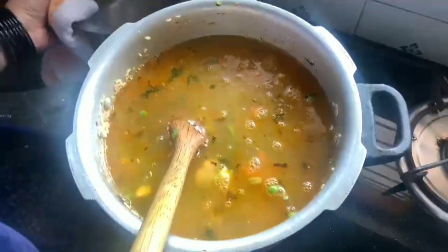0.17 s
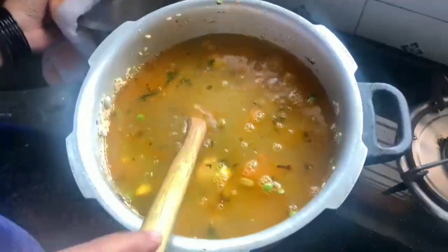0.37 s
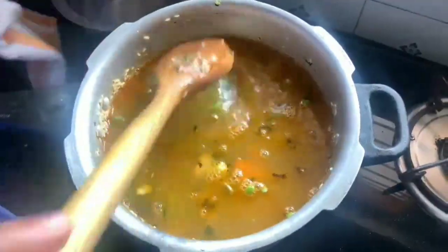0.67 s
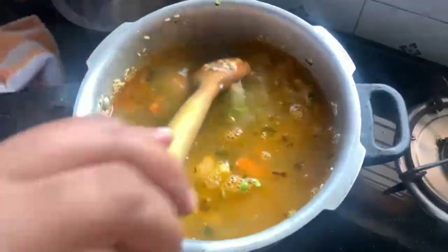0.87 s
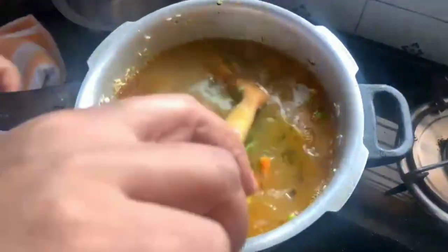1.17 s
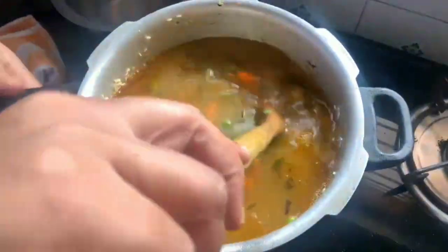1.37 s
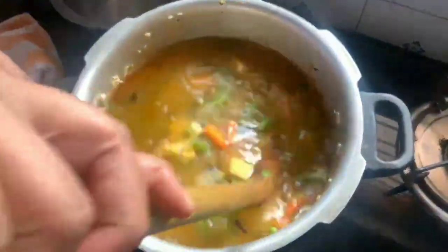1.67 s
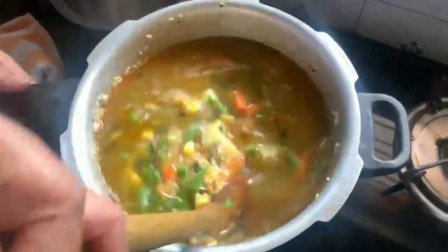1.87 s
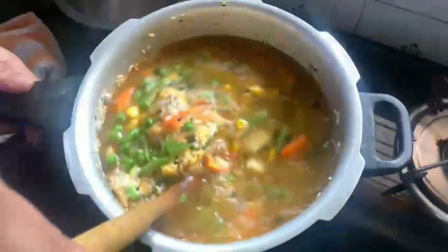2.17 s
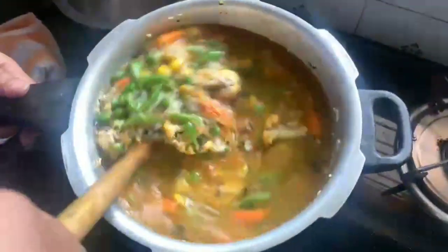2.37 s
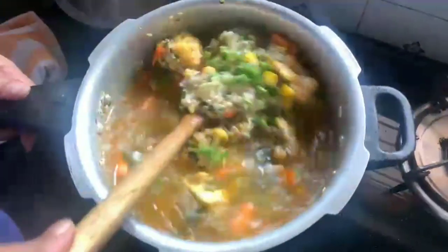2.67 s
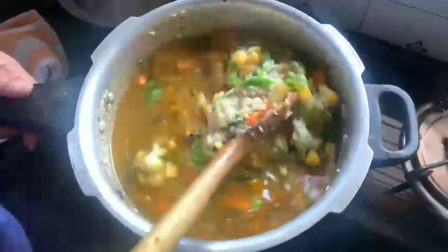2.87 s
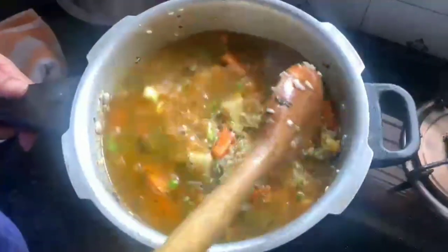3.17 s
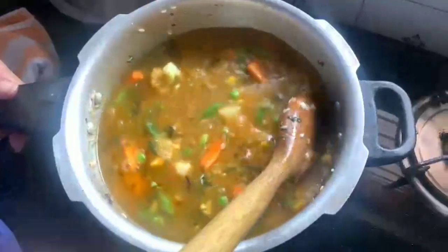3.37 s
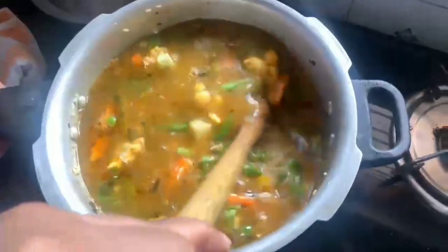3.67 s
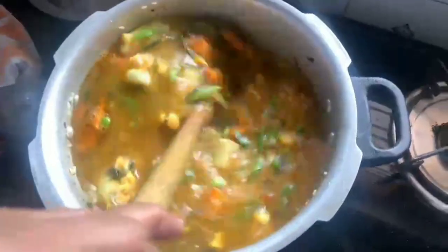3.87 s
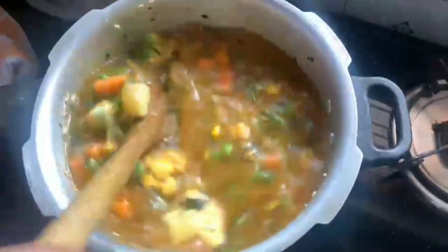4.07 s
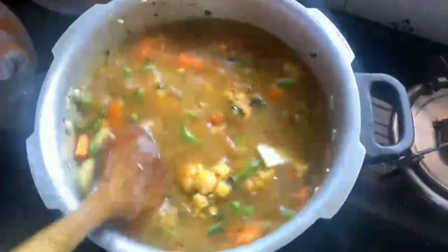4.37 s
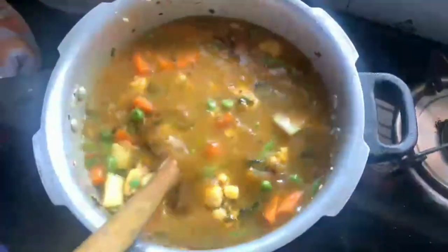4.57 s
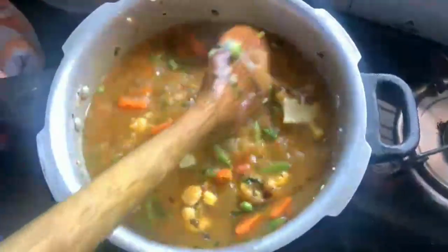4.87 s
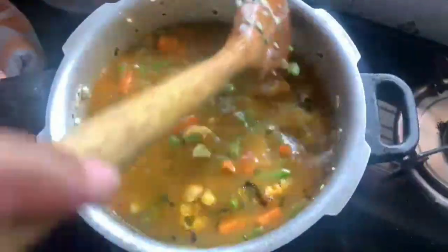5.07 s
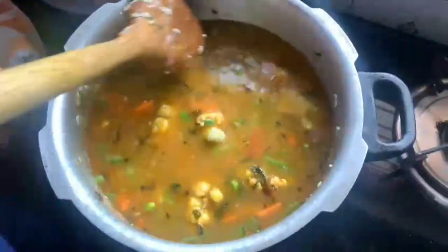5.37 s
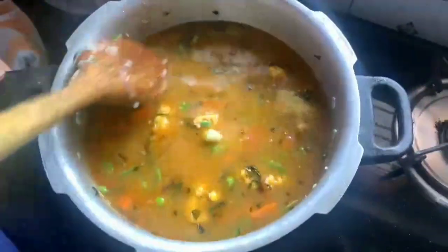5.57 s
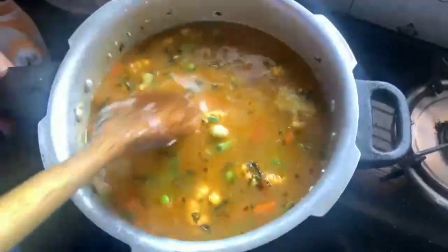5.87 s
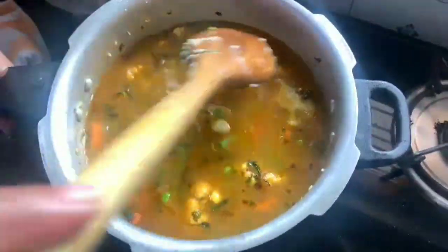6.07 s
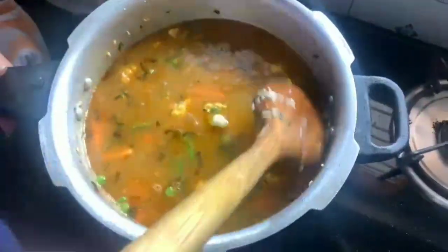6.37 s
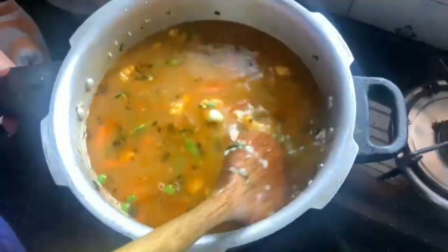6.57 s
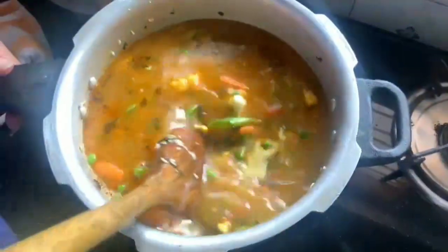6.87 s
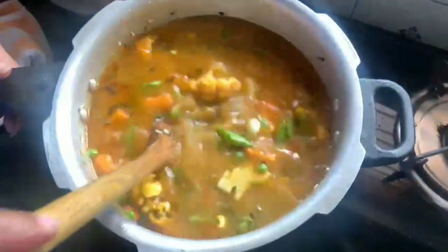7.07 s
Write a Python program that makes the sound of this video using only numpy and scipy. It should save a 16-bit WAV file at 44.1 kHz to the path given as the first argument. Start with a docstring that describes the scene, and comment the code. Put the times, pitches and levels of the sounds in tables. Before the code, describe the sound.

A metal vessel clangs down, then a wooden spoon stirs thick, wet rice and vegetable broth with squelches, plops and a few knocks against the pot.

```python
"""A wooden spoon stirs rice, vegetables and hot water in a pressure cooker, close to the microphone.
Swarms of tiny fading tones and coloured noise make the broth slosh, squelch and fizz; noise puffs and
rising tones make splashes and plops. The spoon knocks, drags, thuds and rubs. At the start a metal vessel
clangs: noise blows and fluttering modes. Two wavering hums, rumble and air noise fill the tiled kitchen."""
import sys
import numpy as np
from scipy import signal
from scipy.fft import rfft, irfft, next_fast_len
from scipy.io import wavfile
from scipy.ndimage import map_coordinates

SR = 44100
rng = np.random.default_rng(int(sys.argv[2]) if len(sys.argv) > 2 else 0)


def dump(signal):
    """Clip the signal to [-1, 1] and save it as 16-bit WAV at the path in sys.argv[1]."""
    limited = np.clip(np.atleast_2d(signal).T, -1, 1)
    pcm = np.round(limited * 32767).astype(np.int16)
    wavfile.write(sys.argv[1], SR, pcm)


N = 318798  # length in samples
TOP_HZ = 12900  # nothing is heard above this

# how alike left and right are: pitch_hz, likeness (0 to 1)
ALIKE = [(60, 1), (130, 0.85), (280, 0.95), (590, 0.18), (1260, 0.15), (2700, 0.047), (5500, 0.028),
         (8000, 0.99), (11000, 0.87), (12500, 0.99)]
# colour of the finest bursting bubbles: pitch_hz, level_db
FIZZ = [(2500, -45), (5000, -15), (7000, 6), (8800, 10.5), (10500, 10), (12500, 16)]
# colour of the pot when the spoon strikes or drags on it: pitch_hz, level_db
KNOCK_BODY = [(120, -8), (260, -5), (340, 6.5), (470, -5), (600, 2), (830, 6.5), (1100, 0), (1400, -1),
              (1900, 1), (2800, -1), (3600, -9.5), (4300, -14), (6500, -11.5), (9000, -19), (12000, -13)]


def amp(db):
    """Decibels to gain."""
    return 10 ** (np.asarray(db) / 20)


def unit(x):
    """Scale to rms 1."""
    return x / np.sqrt(np.mean(x ** 2) + 1e-20)


def along(points, hz):
    """Read (Hz, value) points on a log axis."""
    point_hz, value = np.transpose(points)
    return np.interp(np.log(hz + 1), np.log(point_hz + 1), value)


def curves(rows):
    """One value per sample for each column after the time."""
    s, *columns = np.transpose(rows)
    return [np.interp(np.arange(N) / SR, s, column) for column in columns]


def wobble(rate):
    """A smooth random curve, rate knots a second."""
    knots = rng.standard_normal(int(N * rate / SR) + 4)
    return map_coordinates(knots, [np.arange(N) * rate / SR])


def fading(db, t60):
    """Half a second of a level dying away by 60 dB in t60 seconds."""
    return amp(db - 60 * np.arange(SR // 2) / SR / t60)


def filtered(x, response):
    """Multiply the spectrum of x by a response to frequency."""
    n = x.shape[-1]
    m = next_fast_len(n + SR // 2)
    return irfft(rfft(x, m) * response(np.fft.rfftfreq(m, 1 / SR)), m)[..., :n]


def shaped(x, spectrum):
    """Colour a sound by (Hz, dB) points, rms 1."""
    return unit(filtered(x, lambda hz: amp(along(spectrum, hz))))


def add(track, s, sound):
    """Mix a sound into a track at a time in seconds."""
    part = track[..., max(0, round(s * SR)):][..., :sound.shape[-1]]
    part += sound[..., :part.shape[-1]]


def add_grains(when, grains, span):
    """Add up many short sounds, one a row, each starting at its share (0 to 1) of a span of samples."""
    places = (when * span).astype(int) + np.arange(grains.shape[1])
    return np.bincount(places.ravel(), grains.ravel(), span)


def diffuse(response, size=N):
    """Coloured stereo noise whose middle and side parts are balanced to the likeness of the two ports."""
    def mid_and_side(hz):
        turn = np.arccos(np.clip(along(ALIKE, hz), -1, 1)) / 2
        return response(hz) * np.array([np.cos(turn), np.sin(turn)])

    mid, side = filtered(rng.standard_normal((2, size)), mid_and_side)
    return np.array([mid + side, mid - side]) / np.std(mid)


def burst(response, t60, size=4096):
    """A stereo puff of coloured noise that dies away, peak 1."""
    hz = np.fft.rfftfreq(size, 1 / SR)
    phase, spread = rng.uniform(-np.pi, np.pi, (2, len(hz)))
    spread = spread * np.sqrt(np.clip(1 - along(ALIKE, hz), 0, 1)) / 2
    noise = irfft(np.exp(1j * (phase + np.array([spread, -spread]))))
    noise = noise * amp(-60 * np.arange(size) / SR / t60)
    # minimum phase: the colour rings after the blow, never before it
    log_gain = np.log(response(np.abs(np.fft.fftfreq(size, 1 / SR))) + 1e-5)
    colour = np.exp(np.conj(signal.hilbert(log_gain)))
    puff = irfft(rfft(noise) * colour[:len(hz)])
    return puff / np.abs(puff).max()


def room(x):
    """The kitchen's reverberation: a tail of fading noise, different at each port."""
    # how long the echo lasts: pitch_hz, t60_s (time to fall 60 dB)
    echo_times = [(200, 0.63), (1000, 0.35), (4000, 0.34), (11000, 0.084)]
    hz, t, noise = signal.stft(rng.standard_normal((2, SR // 2)), SR, nperseg=256)
    fade = amp(-60 * t / along(echo_times, hz)[:, None])
    balance = np.sqrt(np.clip(1 + np.outer([1, -1], along(ALIKE, hz)), 0, 2))[..., None]
    mid, side = signal.istft(noise * fade * balance, SR, nperseg=256)[1]
    tail = np.pad([mid + side, mid - side], ((0, 0), (SR // 250, 0)))  # starts 4 ms late
    return signal.fftconvolve(np.atleast_2d(x), tail / np.linalg.norm(tail[0]), axes=1)[:, :N]


def from_pot(x, wall_db, wall_t60, room_db):
    """Direct sound from the broth, quick echoes off the pot's wall, then the room."""
    t = np.arange(SR // 16) / SR
    walls = diffuse(np.ones_like, size=len(t)) * amp(-60 * t / wall_t60) * (t > 1 / 1500)
    echoes = signal.fftconvolve(x[None], walls / np.linalg.norm(walls[0]), axes=1)[:, :N]
    return x + amp(wall_db) * echoes + amp(room_db) * room(x)


def bubbles(rate, low_hz, high_hz, cycles, spread_db, size):
    """A steady swarm of tiny damped tones, rising in pitch, a few of them loud; rms 1."""
    when, pitch, strength = rng.random((int(rate * N / SR), 3)).T[..., None]
    turns = low_hz * (high_hz / low_hz) ** pitch * np.arange(size) / SR
    age = np.minimum(turns / cycles, 2)
    level = amp(-spread_db * np.log(strength + 0.0035) - 30 * turns / cycles)
    tones = level * np.sin(2 * np.pi * turns * (1 + 0.092 * age))
    return unit(add_grains(when, tones, N)[:N])


def uneven(x):
    """Raise and lower patches of a sound at random, smoothly over pitch and time."""
    depth_db, width_hz, hold_s = 5, 520, .065
    hz, t, spectrum = signal.stft(x, SR, nperseg=512)
    where = np.meshgrid(hz / width_hz, t / hold_s, indexing="ij")
    knots = rng.standard_normal([int(axis.max()) + 2 for axis in where])
    gain = amp(depth_db * np.clip(map_coordinates(knots, where), -2, 2))
    return signal.istft(spectrum * gain, SR, nperseg=512)[1][:N]


def ring(hz, envelope, flutter_db):
    """Ringing metal: each mode follows its envelope and flutters in level and phase."""
    t = np.arange(SR // 2) / SR
    knots = np.linspace(0, t[-1], 36)
    flutter = lambda: np.interp(t, knots, rng.standard_normal(len(knots)))
    swell, slip = np.array([[flutter() for _ in hz] for _ in range(2)])
    phase, offset = rng.uniform(-np.pi, np.pi, (len(hz), 2)).T[..., None]
    offset = offset * np.sqrt(np.clip(1 - along(ALIKE, hz), 0, 1)) / (2 * np.pi)
    angle = 2 * np.pi * hz * t + phase + slip / 2 + np.array([offset, -offset])
    modes = envelope * amp(flutter_db * swell) * np.sin(angle)
    return modes.sum(1) * (1 - np.exp(-t / 0.00043))  # soft onset


def stirring():
    """The spoon pushes broth about, wet rice squelches apart and tiny bubbles burst."""
    # how hard the spoon pushes the broth, before trims: start_s, level_db
    push_curve = [(.8, -85), (1.1, -60), (1.42, -57.5), (1.545, -53.5), (1.72, -60.5), (2.07, -71),
                  (2.22, -55.5), (2.45, -56), (2.52, -56.5), (2.56, -56.5), (2.66, -52.5), (2.88, -64.5),
                  (3.4, -65.5), (4.1, -70), (4.6, -58), (4.9, -96), (5.2, -57)]
    # how much wet rice turns over at the surface, before trims: start_s, level_db
    churn_curve = [(.55, -76), (.75, -77), (.97, -69), (1.31, -81.5), (1.6, -71), (1.95, -64.5),
                   (2.12, -69), (2.4, -55), (2.6, -64), (2.83, -59.5), (3.0, -57.5), (3.4, -60),
                   (3.68, -65), (3.85, -57), (4.08, -52), (4.2, -58), (4.7, -66.5), (5.2, -78)]
    # colours of the moving broth and of the parting rice: pitch_hz, level_db
    slosh_colour = [(150, -12.5), (300, 8.5), (600, 1), (900, 3), (1400, 4.5), (2200, -39), (4000, -31),
                    (9000, -61)]
    squelch_colour = [(600, -27), (1200, 1), (2000, -10), (3400, -7.5), (5000, -4.5), (7500, -14.5),
                      (12000, -32)]
    slosh_db, squelch_db, fizz_db = -1.5, -4.5, 0.5  # slosh against the push, the others against the churn

    (push_db,), (churn_db,) = curves(push_curve), curves(churn_curve)
    churn = amp(churn_db + 2.5 * wobble(8.7))  # the rice gives way unevenly
    in_broth = np.interp(np.arange(N) / SR, [.3, .45, 5.12, 5.25], [0, 1, 1, 0])
    # between the bubbles, rice slides over the wood in quick uneven surges
    swish = lambda: unit(amp(3 * wobble(45)) * rng.standard_normal(N))
    clumps = unit(amp(3 * wobble(26)))  # the grains come in clumps
    gurgle = bubbles(rate=900, low_hz=200, high_hz=1800, cycles=4, spread_db=1.3, size=700)
    grains = bubbles(rate=700, low_hz=1500, high_hz=8000, cycles=10, spread_db=3, size=250)
    pops = bubbles(rate=450, low_hz=5200, high_hz=12500, cycles=8, spread_db=4.3, size=100)
    slosh = shaped(gurgle + swish() / 2, slosh_colour) * amp(push_db + slosh_db + 1.5 * wobble(18))
    squelch = shaped(uneven(grains + swish() / 3), squelch_colour) * amp(squelch_db)
    fizz = shaped(uneven(pops + swish() / 3), FIZZ) * amp(fizz_db)
    broth = slosh + churn * clumps * (squelch + fizz) + crackle()
    return from_pot(in_broth * broth, wall_db=-7, wall_t60=.03, room_db=-13)


def crackle(count=90, size=400):
    """As a lump parts, wet films between the grains burst in a shower of tiny pitched ticks, with fizz."""
    # lumps that pull apart or slide off the spoon: middle_s, level_db (before trims), pitch_hz, length_s
    lumps = [(0.495, -60.5, 4470, 0.091), (1.042, -64, 4300, 0.15), (1.216, -69, 1400, 0.095),
             (1.999, -73, 5000, 0.064), (2.485, -52, 4370, 0.082), (2.62, -59.5, 1830, 0.057),
             (2.677, -52, 6100, 0.11), (2.736, -55.5, 4080, 0.056), (2.784, -48.5, 6430, 0.061),
             (2.827, -49, 5960, 0.081), (2.862, -63, 6040, 0.068), (2.917, -56.5, 5500, 0.082),
             (3.006, -70, 4200, 0.058), (3.156, -55.5, 6560, .14), (3.154, -62, 2140, .12),
             (3.22, -59, 4500, 0.047), (3.295, -59, 5450, 0.055), (3.349, -62, 6100, 0.036),
             (3.396, -72, 5500, 0.063), (3.493, -58.5, 3670, .11), (3.826, -49.5, 3800, 0.064),
             (3.943, -47, 3000, 0.061), (4.011, -47, 1810, 0.11), (4.06, -48, 7000, 0.052),
             (4.082, -58, 2400, 0.051), (4.108, -54, 2060, 0.045), (4.11, -50.5, 7000, 0.079),
             (4.149, -55, 1840, 0.048), (4.15, -76, 6000, 0.072), (4.218, -56, 5940, 0.038),
             (4.22, -53, 1800, 0.076), (4.253, -59, 7000, 0.075), (4.298, -64, 3580, 0.045),
             (4.476, -57, 7500, 0.042), (4.55, -64, 6000, 0.053), (4.593, -61, 4440, 0.031),
             (4.899, -60, 2600, 0.11), (4.948, -60, 3600, 0.029)]
    tick_db, fizz_db = -0.5, -2  # trims on each lump's level
    scatter_octaves, life_cycles = 0.46, 13.3  # a tick falls 40 dB in its life
    showers, swell = np.zeros(N), np.zeros(N)
    for s, db, pitch_hz, length_s in lumps:
        span = int(length_s * SR)
        when = rng.beta(2.5, 2.5, (count, 1))  # thickest in the middle
        pitch, strength = np.clip(rng.standard_normal((2, count, 1)), -2, 2)
        tick_hz = np.minimum(pitch_hz * 2 ** (scatter_octaves * pitch), TOP_HZ)
        turns = tick_hz * np.arange(size) / SR
        ticks = amp(4 * strength - 40 * turns / life_cycles) * np.sin(2 * np.pi * turns)
        shower = add_grains(when, ticks, span)
        add(showers, s - length_s / 2, amp(db + tick_db) * unit(shower) / 2)
        add(swell, s - length_s / 2, amp(db + fizz_db) * np.hanning(span))
    pops = bubbles(rate=1500, low_hz=5200, high_hz=12500, cycles=8, spread_db=3, size=100)
    return showers + swell * shaped(pops, FIZZ)


def splashes():
    """Drops smack the surface amid faint clicks; trapped air rings with a slightly rising pitch."""
    # drops and wet smacks: start_s, level_db, brightest_hz
    drops = [(0.473, -34, 6300), (0.7171, -33.5, 2300), (0.83, -21, 4300), (1.015, -43, 6660),
             (1.082, -41, 6600), (1.187, -45.5, 7400), (1.6797, -49, 9500), (1.6997, -48, 10000),
             (1.799, -45.5, 7500), (1.899, -46, 9500), (1.981, -41, 3260), (2.2215, -43.5, 9500),
             (2.353, -45, 8700), (2.3752, -46, 10000), (2.445, -42, 7350), (2.478, -20.5, 4400),
             (2.613, -42, 9400), (2.678, -49, 7000), (2.7783, -44, 6500), (2.8133, -29, 6000),
             (2.899, -40, 10000), (2.998, -40.5, 9500), (3.1109, -33.5, 9100), (3.129, -37, 7000),
             (3.342, -37, 9200), (3.365, -29, 10700), (3.7395, -23.5, 7100), (3.742, -31, 5000),
             (3.771, -20.5, 8300), (3.8154, -28.5, 2850), (3.824, -25, 3540), (3.8874, -41, 3000),
             (3.916, -34, 7000), (3.9325, -18, 6000), (3.942, -23, 4070), (3.951, -31, 4200),
             (4.0174, -24.5, 3000), (4.0516, -28.5, 6600), (4.062, -29, 7500), (4.089, -18.5, 9200),
             (4.093, -43, 9000), (4.108, -30, 8000), (4.097, -31, 2090), (4.112, -36, 2000),
             (4.148, -45, 1800), (4.24, -36, 3500), (4.315, -42, 2520), (4.178, -33, 10400),
             (4.1982, -38, 10400), (4.2162, -23, 9300), (4.2228, -25.5, 9800), (4.3747, -38.5, 10400),
             (4.4036, -45, 5700), (4.4353, -45.5, 11000), (4.474, -37, 6500), (4.5025, -42, 10560),
             (4.8434, -42.5, 6850), (4.896, -44, 10500), (4.941, -53, 7500), (4.991, -47.5, 10400),
             (5.0624, -43.5, 11200), (5.089, -47, 11300), (5.172, -45, 11000), (6.488, -43, 11000),
             (6.6018, -46.5, 4530)]
    # air pockets closing behind the spoon: start_s, level_db (before trims), pitch_hz (at first), t60_s
    air_pockets = [(0.717, -35, 1930, 0.038), (2.957, -44.5, 1010, .015), (3.488, -41, 3120, 0.028),
                   (3.739, -25.5, 2220, 0.011), (3.7736, -27, 720, 0.011), (3.826, -26, 3570, 0.02),
                   (3.853, -36.5, 1185, 0.028), (3.9344, -26.5, 1750, 0.018), (3.987, -41, 1600, .015),
                   (4.018, -23.5, 964, 0.032), (4.044, -37, 870, 0.04), (4.084, -33.5, 2480, 0.021),
                   (4.106, -33.5, 1970, 0.022), (4.144, -40, 1460, 0.024)]
    wet = [(300, -48), (1100, -16), (2300, 6.5), (6000, 5.0), (12000, 14.0), (14000, -38.5)]  # (Hz, dB)
    # faint clicks scattered just before and after a smack: time scale, level against it
    click_s, click_db = 0.014, -20.5

    smacks, plops, t = np.zeros(N), np.zeros(N), np.arange(SR // 10) / SR
    band = lambda centre, octaves: lambda hz: 1 / (1 + (np.log2(hz / centre + 0.0007) / octaves) ** 2)
    for s, db, bright_hz in drops:
        colour = lambda hz: band(bright_hz, octaves=1.1)(hz) * amp(along(wet, hz))
        add(smacks, s, amp(db) * burst(colour, t60=.007)[0])
        for offset in rng.uniform(-.5, 1, size=4):
            click = burst(colour, t60=0.012, size=1024)[0]
            add(smacks, s + click_s * offset, amp(db + click_db - 13 * abs(offset)) * click)
    for s, db, pitch_hz, t60 in air_pockets:
        tone = np.sin(2 * np.pi * pitch_hz * t * (1 + 2 * t)) * amp(-60 * t / t60)
        add(plops, s, amp(db - 2) * tone)
        add(plops, s, amp(db - 6) * burst(band(pitch_hz, octaves=0.45), t60=0.02)[0])
    return from_pot(smacks + plops, wall_db=-2, wall_t60=0.04, room_db=-10)


def knocks():
    """The spoon cracks against the pot and rebounds; the filled pot rings briefly, duller if soft."""
    # contacts with the pot: start_s, level_db, dull_above_hz
    contacts = [(2.4634, -32, 2000), (3.107, -41, 1790), (6.3297, -19.5, 9000), (6.4343, -30.5, 2100),
                (6.4863, -34.5, 1710)]
    # the filled pot's damped ring, before trims: pitch_hz, level_db, t60_s
    pot_modes = [(344, -4.5, 0.053), (766, -7, 0.014), (860, -3.5, 0.065), (1916, -5.5, 0.043),
                 (2140, -14, 0.047), (2650, -28, 0.027), (2790, -11, 0.026), (3800, -10, .025),
                 (6340, -17, 0.033)]
    ring_db, rebound_s, rebound_db = -9.5, .0028, -7.5  # ring and second contact against the crack

    blows = np.zeros((2, N))
    hz, mode_db, t60 = np.transpose(pot_modes)[..., None]
    for s, db, dull_hz in contacts:
        soft = lambda f: 1 / np.hypot(1, (f / dull_hz) ** 2)
        colour = lambda f: amp(along(KNOCK_BODY, f)) * soft(f)
        rebound_colour = lambda f: colour(f) / np.hypot(1, f / 3500)
        add(blows, s, amp(db) * burst(colour, t60=.014))
        add(blows, s + rebound_s, amp(db + rebound_db) * burst(rebound_colour, t60=0.04))
        pot_ring = ring(hz, soft(hz) * fading(mode_db, t60), flutter_db=-5.0)
        add(blows, s, amp(db + ring_db) * pot_ring)
    return blows + amp(-11.5) * room(blows)


def drag():
    """Wood sticks and slips on the wet metal: jerky noise with the colour of a knock, but duller."""
    # the spoon drags along the wall between knocks: start_s, level_db
    drag_curve = [(6.26, -100), (6.31, -56), (6.36, -60), (6.4, -66), (6.43, -51), (6.5, -58.5),
                  (6.54, -68), (6.7, -100)]
    drag_db, = curves(drag_curve)
    slips = unit(amp(4 * wobble(160)))
    return amp(drag_db) * slips * diffuse(lambda hz: amp(along(KNOCK_BODY, hz)) / np.hypot(1, hz / 2600))


def thuds():
    """The spoon bumps the bottom, cushioned by rice: a soft onset and a low, toneless body."""
    # bumps, level before the soft onset: start_s, level_db
    bottom_bumps = [(1.526, -31.5), (1.54, -36.5), (2.541, -38.5), (5.197, -36.5)]
    # colour of a bump: pitch_hz, level_db
    bump_colour = [(90, 0.5), (170, 1.5), (300, 2), (650, -2.5), (950, -8.5), (1500, -26), (2600, -21),
                   (5000, -45)]
    bumps = np.zeros((2, N))
    for s, db in bottom_bumps:
        bump = burst(lambda f: amp(along(bump_colour, f)), t60=0.12)
        onset = 1 - np.exp(-np.arange(bump.shape[-1]) / SR / 0.00073)
        add(bumps, s, amp(db) * bump * onset)
    return bumps + amp(-9.0) * room(bumps)


def rub():
    """The wooden spoon slides with a faint, uneven, airy hiss."""
    # the lifted spoon rubs along the upper wall: start_s, level_db (before the wobble)
    wipe_curve = [(5.12, -108), (5.24, -63.5), (5.45, -69.5), (5.6, -60.5), (5.72, -63.5), (5.83, -63.5),
                  (5.92, -108)]
    # colour of the hiss: pitch_hz, level_db
    rub_colour = [(2000, 4.5), (3500, -2), (5000, 4), (7000, -1), (8500, -6.5), (10400, 3), (12000, -23)]
    wipe_db, = curves(wipe_curve)
    noise = diffuse(lambda hz: amp(along(rub_colour, hz)))
    hiss = np.array([uneven(side) for side in noise])
    return amp(wipe_db + 4.5 * wobble(27)) * unit(hiss)


def cookware():
    """A vessel ringing from a tap lands in a quick rattle that chokes that ring and builds a deeper one."""
    # blows as the vessel is set down, before a trim: start_s, level_db
    rattle = [(.0815, -15), (.0885, -10), (.0922, 0), (.0975, -4), (.1050, -6), (.1145, -4), (.1310, -12)]
    # its modes, levels before trims: pitch_hz, tapped_level_db, set_down_level_db, t60_s (once it stands)
    vessel_modes = [(188.2, -56.5, -51.5, 1), (257, -68, -60, 0.3), (311.3, -51, -35.5, 0.27),
                    (377.6, -52.5, -37, 0.16), (472, -76.6, -54, 0.63), (505, -70, -54, 0.5),
                    (529, -63, -48, 0.46), (669, -56, -45, 0.37), (782, -70, -54, 0.33),
                    (856, -60, -41, 0.43), (940, -72, -52, 0.3), (1040, -59, -75, .3),
                    (1215, -62, -45, 0.36), (1328, -60, -52, 0.32), (1380, -64, -75, 0.6),
                    (1550, -63, -80, .3), (1610, -78, -61.5, 0.74), (1750, -64, -73, 1),
                    (2020, -72, -69, 0.6), (2125, -76, -61, 0.6), (2190, -48, -62, 0.58),
                    (2310, -60.5, -62.5, 0.53), (2540, -80, -84, .22), (2700, -69, -75, .3),
                    (2697, -78, -60.5, 0.57), (2802, -68, -52.5, 0.25), (3000, -67, -88, .2),
                    (3290, -57.5, -83, .55), (3407, -79, -52, 0.28), (3550, -67, -79, .2),
                    (3900, -72, -82, .3), (4200, -80, -64, 0.3), (4165, -69, -64, 0.42),
                    (4520, -72, -66, 0.36), (4750, -72, -59, 0.32), (4960, -88, -73, .5),
                    (5400, -70, -87, .3), (5455, -69, -74, .45), (6033, -73, -89, .35),
                    (6650, -73, -80, .35), (7050, -68, -77, .35), (7250, -69, -68, .35)]
    # colours of the blows and of the grating base: pitch_hz, level_db
    blow_colour = [(100, -26), (200, -9), (330, 0), (450, -9), (560, -5), (850, -4), (1100, -18),
                   (1350, -15), (1800, -36), (2700, -27), (4000, -38), (11000, -42)]
    grate_colour = [(500, -15), (1700, -11), (3000, -5), (4500, -3.5), (7000, 3), (10500, -1.5),
                    (12500, -7.5)]
    tap_t60_s, landing_s, choke_db_per_s = 0.62, 0.076, 130

    blows, metal, t = np.zeros((2, N)), np.zeros((2, N)), np.arange(SR // 2) / SR
    for s, db in rattle:
        add(blows, s, amp(db - 17.5) * burst(lambda f: amp(along(blow_colour, f)), t60=0.0081))
    landed = np.maximum(t - landing_s, 0)
    choke, build = amp(-choke_db_per_s * landed), 1 - np.exp(-landed / 0.016)

    def envelope(tap_db, landing_db, t60):
        tapped = fading(tap_db, tap_t60_s) * choke
        standing = amp(landing_db - 60 * landed / t60) * build
        return np.hypot(tapped, standing)

    hz, tap_db, landing_db, t60 = np.transpose(vessel_modes)[..., None]
    add(metal, 0, ring(hz, envelope(tap_db + 6.5, landing_db + 13.0, t60), flutter_db=4.5))
    # a crowd of weak high modes shimmers as well
    high_hz = rng.uniform(5500, 11800, size=(60, 1))
    add(metal, 0, ring(high_hz, envelope(tap_db=-80.5, landing_db=-63.5, t60=0.25), flutter_db=8.5))
    # the base grates faintly as it settles
    grate = np.interp(np.arange(N) / SR, [.08, .1, .3, .42], [0.29, 0.99, 1.0, 0.078])
    grate = grate * amp(-61.5 + 2.8 * wobble(40))
    grating = grate * diffuse(lambda f: amp(along(grate_colour, f)))
    return blows + metal + amp(-8.5) * room(blows) + amp(-13.5) * room(metal) + grating


def kitchen():
    """Two wavering hums, rumble gathered in the room's modes, and soft air noise."""
    # the low hum swells and sags, before a trim: start_s, level_db
    hum_curve = [(0.0, -54), (0.2, -47.5), (0.3, -62), (0.54, -49), (0.72, -65), (0.78, -49), (3.3, -45.5),
                 (3.72, -48), (3.87, -66), (4.0, -53), (4.23, -44.5), (4.73, -73), (5.19, -50),
                 (5.33, -56.5), (5.64, -44.5), (5.96, -55), (6.82, -51.5), (7.23, -66)]
    # a second hum, before its wobbles: start_s, pitch_hz, level_db
    whir_curve = [(0, 186, -94), (1.6, 184.7, -72.5), (2.3, 186.5, -51), (3.0, 187.4, -65.5),
                  (4.05, 181.3, -49.5), (4.5, 183.4, -60), (5.4, 179.8, -50), (7.2, 178.1, -73.5)]
    # resonances of the room: pitch_hz, width_hz, level_db
    room_modes = [(43.5, 9.8, -5), (97.8, 21.6, 5), (123.7, 2.7, 0.5), (156.9, 20.2, -4), (182.2, 20, -6),
                  (269.2, 5.7, -11), (309.3, 21.3, -10), (345, 20.5, -14)]
    # colour of the air noise: pitch_hz, level_db
    air_colour = [(20, -1), (60, 2.5), (200, 0), (420, -11.5), (750, -8), (1400, -9), (2200, -17),
                  (3200, -24.5), (4200, -28.5), (6300, -40), (8500, -45), (11000, -27), (13000, -24.5)]

    hum_db, = curves(hum_curve)
    hum_hz = 61.9 + .5 * wobble(3.91)
    hum = amp(hum_db + 3.5) * np.sin(2 * np.pi * np.cumsum(hum_hz) / SR)
    modes = lambda f: sum(amp(db) / (1 + (2 * (f - hz) / width) ** 2) for hz, width, db in room_modes)
    rumble = amp(-50 - 2 * wobble(2.84)) * diffuse(modes)  # drifts slowly in level
    whir_hz, whir_db = curves(whir_curve)
    whir_level = amp(whir_db + 3.3 * wobble(8.8))
    whir = whir_level * np.sin(2 * np.pi * np.cumsum(whir_hz + 1.05 * wobble(6)) / SR)
    air = amp(-58.5) * diffuse(lambda hz: amp(along(air_colour, hz)))
    return hum + rumble + whir + air


def scene():
    """Everything heard at the stove."""
    return stirring() + splashes() + knocks() + drag() + thuds() + rub() + cookware() + kitchen()


def record(dry):
    """The two ports' phase and balance, the microphone's colour and band limit."""
    # how the two ports differ: pitch_hz, left_lead_radians, left_minus_right_db
    port_table = [(60, 0, -1.2), (350, 0, -.5), (850, .6, 3), (2000, 1.3, 1.5), (3500, 2.1, -1.5),
                  (4000, 4.1, -3), (5000, 4.8, -4), (6100, 6.2, -2), (7200, 4.6, 1), (8600, 3.1, 0),
                  (9500, 2, 0), (10300, .6, 0), (11200, 0, 0)]
    # colour of the microphone: pitch_hz, level_db
    mic_colour = [(20, -8), (45, -0.5), (11200, -0.5), (12000, -14), (12900, -52)]
    port_hz, lead, balance_db = np.transpose(port_table)
    half = np.array([[.5], [-.5]])  # each port takes half the difference

    def response(hz):
        phase = np.exp(1j * half * np.interp(hz, port_hz, lead))
        balance = amp(half * np.interp(hz, port_hz, balance_db))
        return phase * balance * amp(along(mic_colour, hz)) * (hz < TOP_HZ)

    return filtered(dry, response)


dry = scene()
out = record(dry)
dump(out)
```